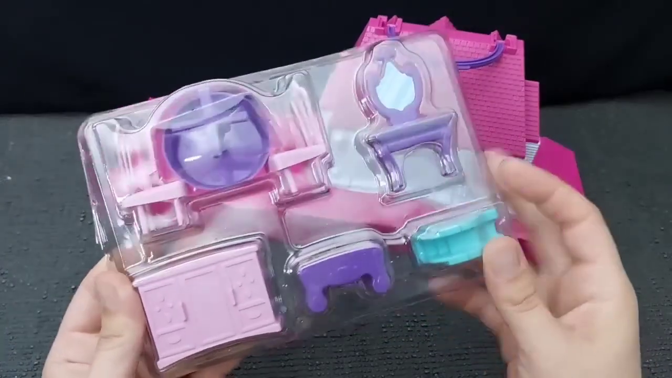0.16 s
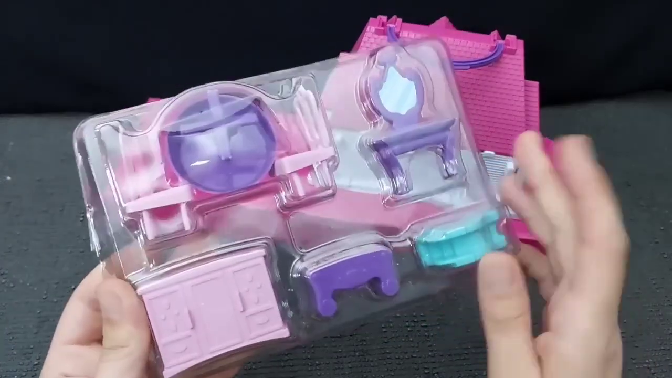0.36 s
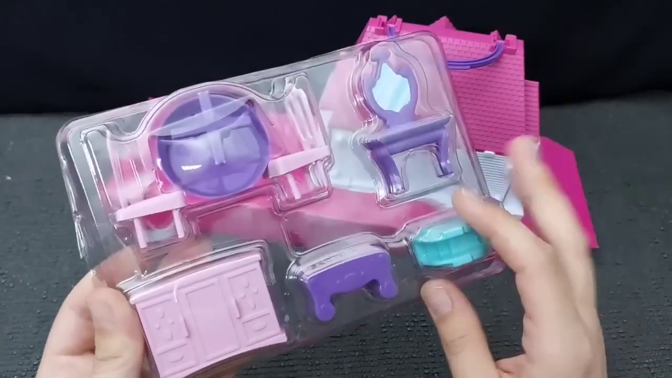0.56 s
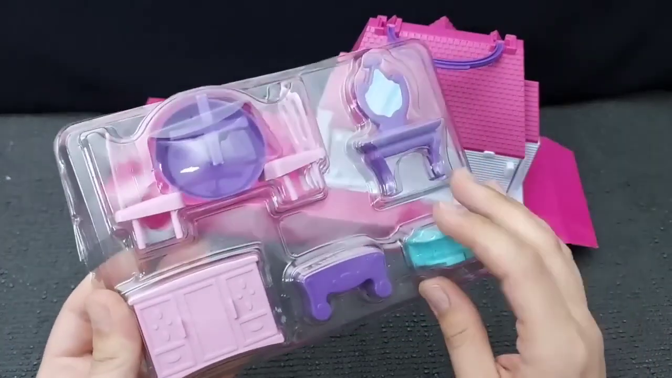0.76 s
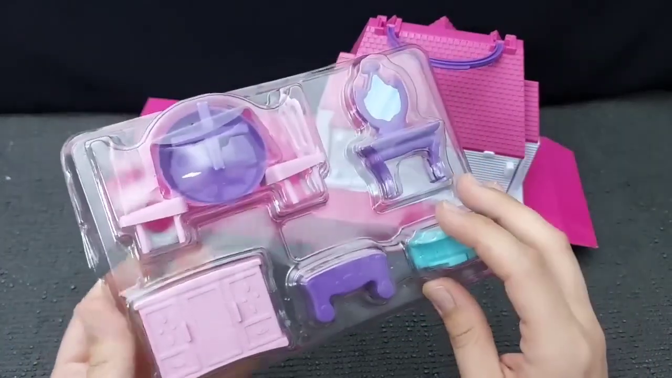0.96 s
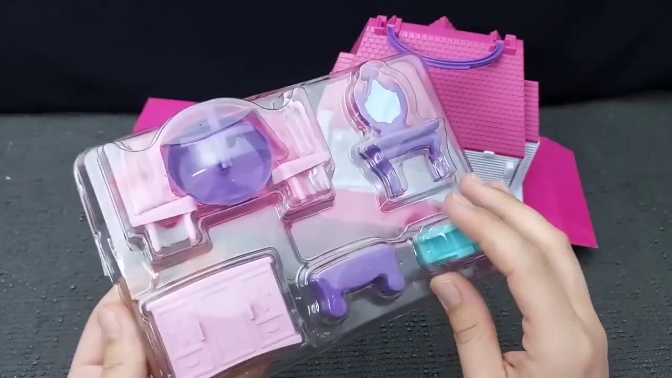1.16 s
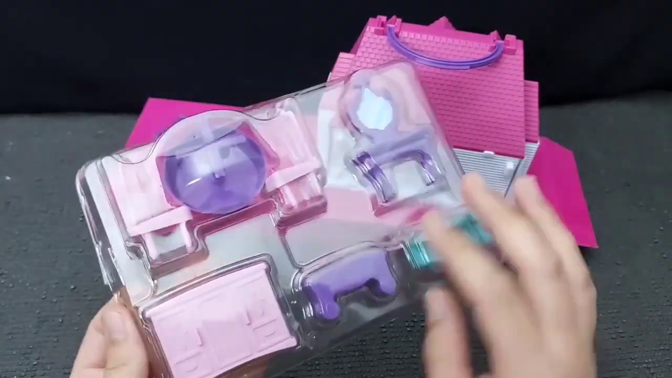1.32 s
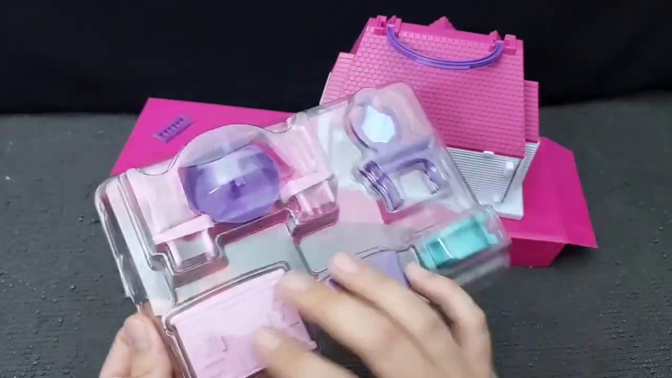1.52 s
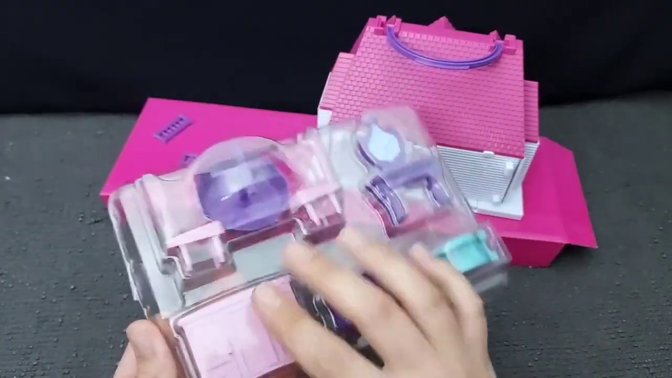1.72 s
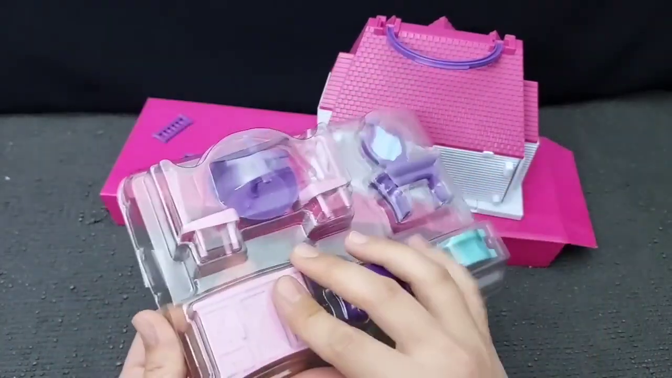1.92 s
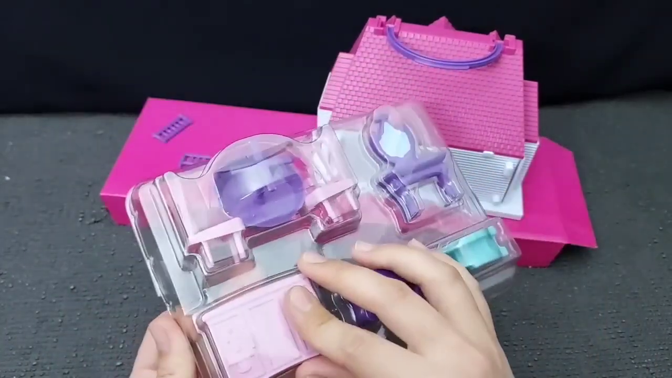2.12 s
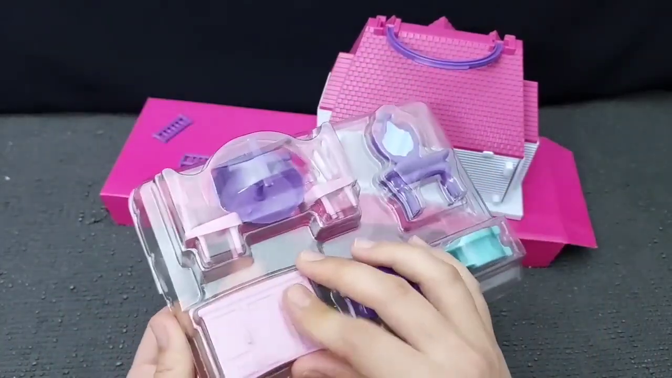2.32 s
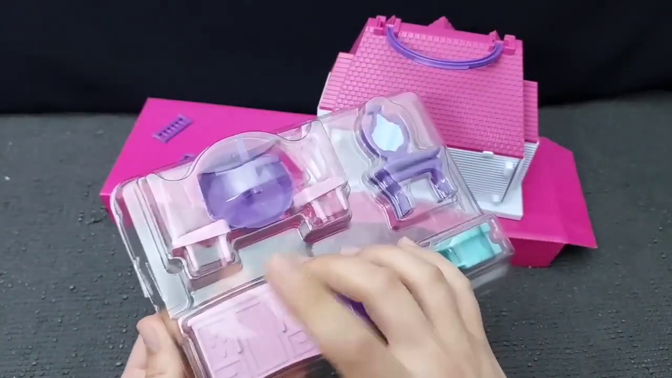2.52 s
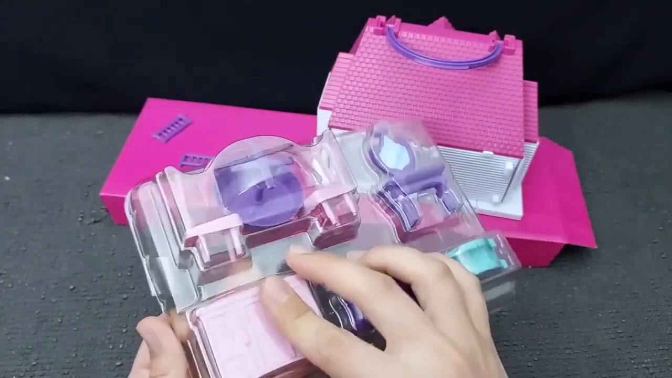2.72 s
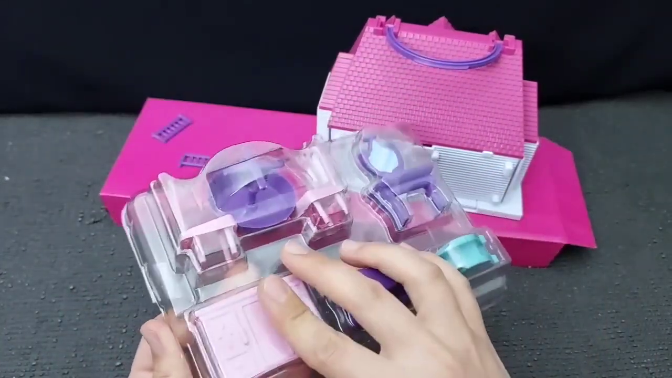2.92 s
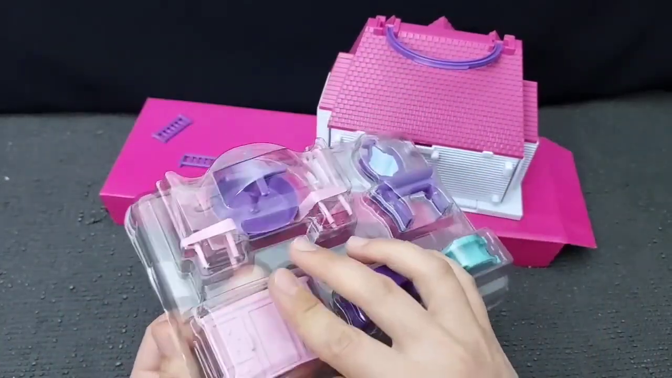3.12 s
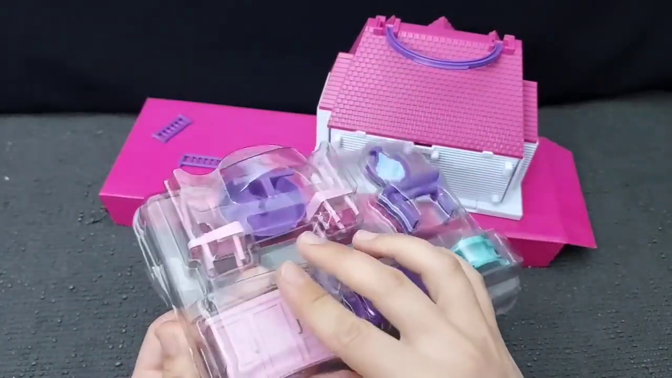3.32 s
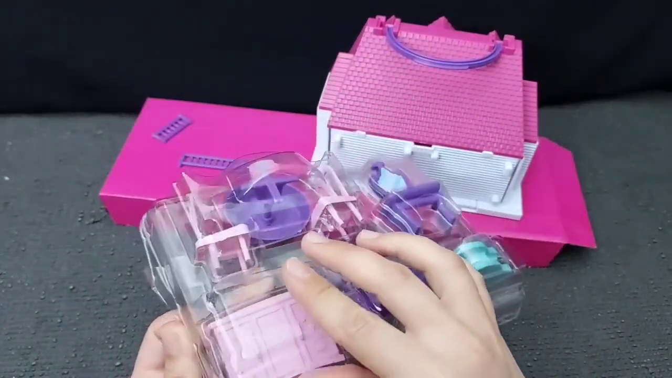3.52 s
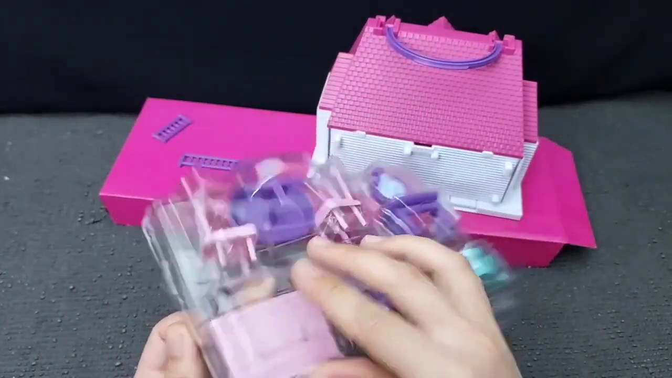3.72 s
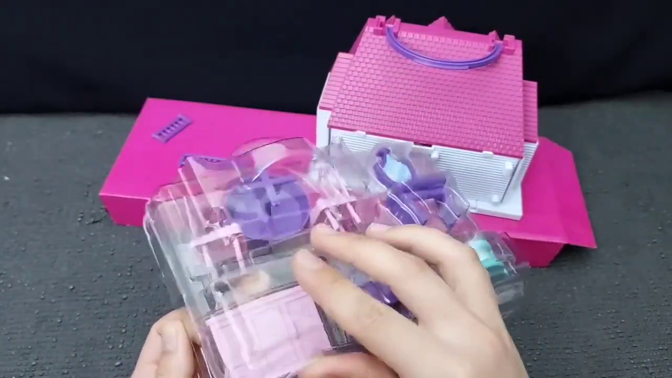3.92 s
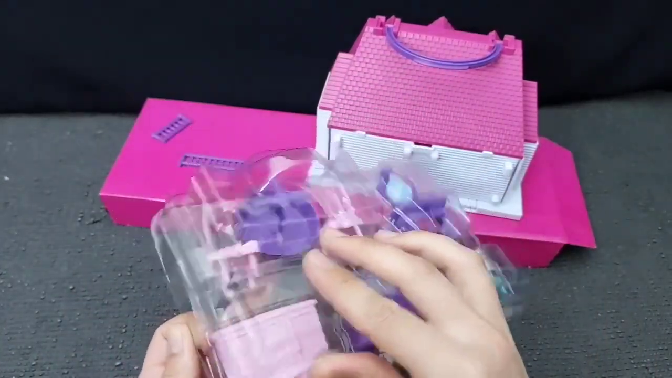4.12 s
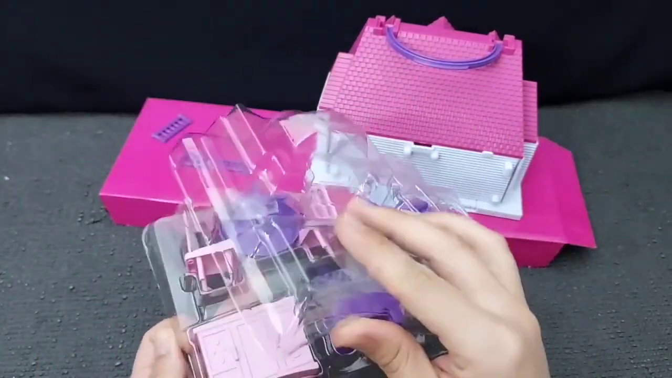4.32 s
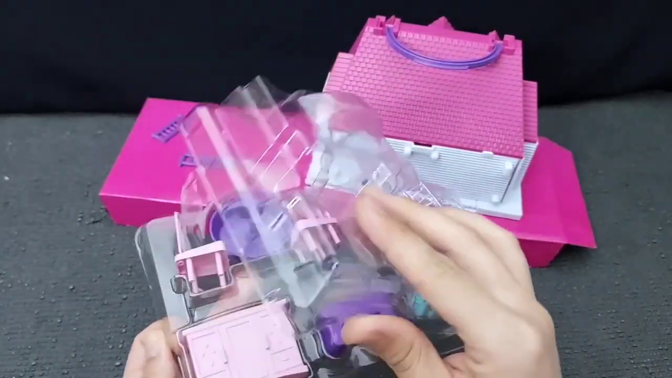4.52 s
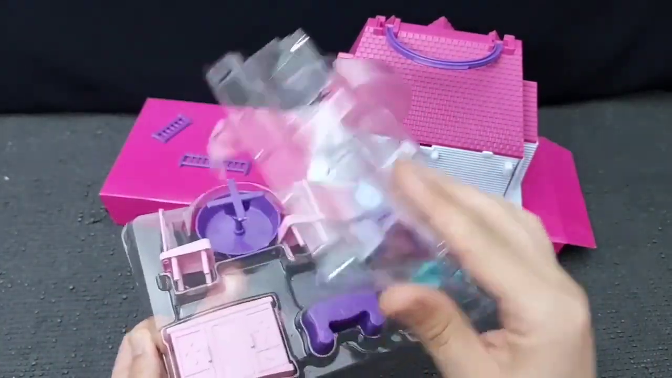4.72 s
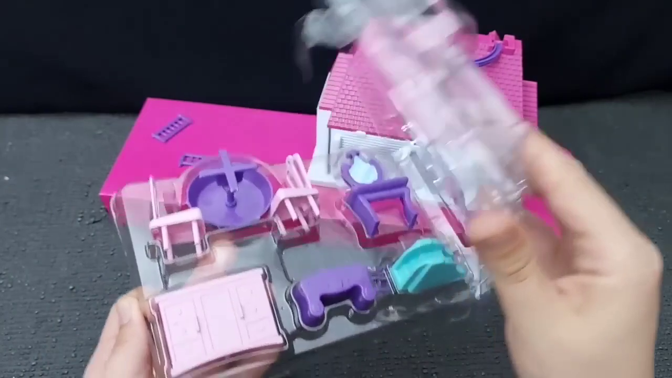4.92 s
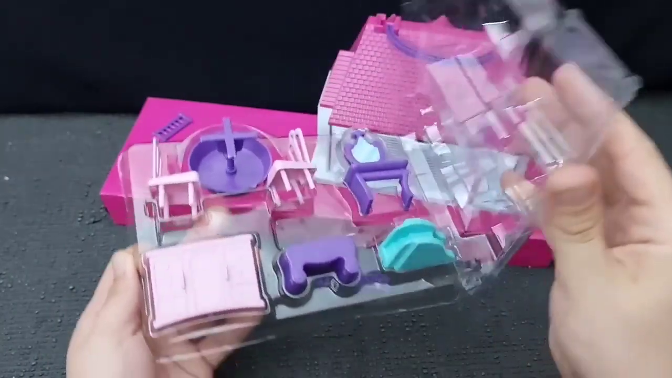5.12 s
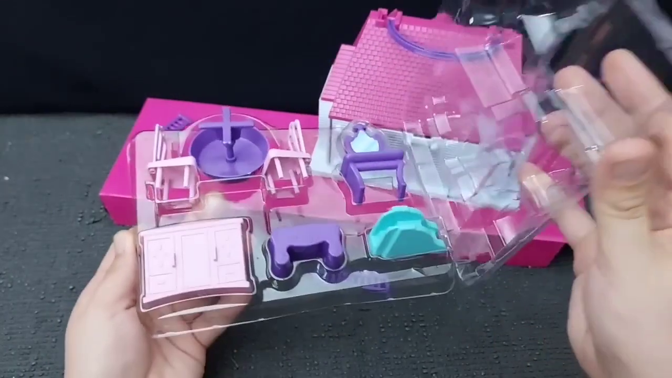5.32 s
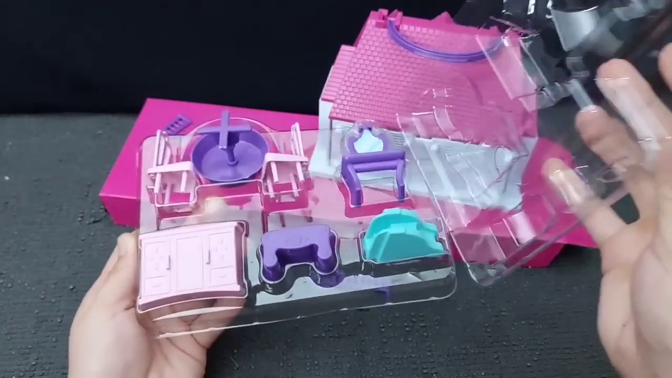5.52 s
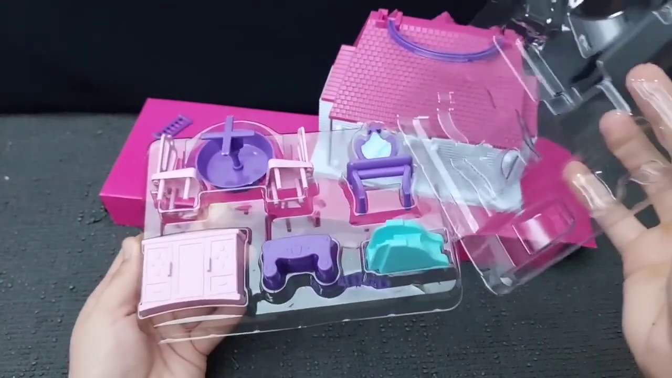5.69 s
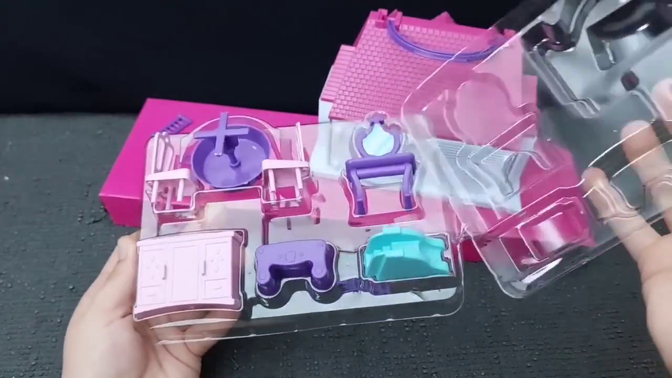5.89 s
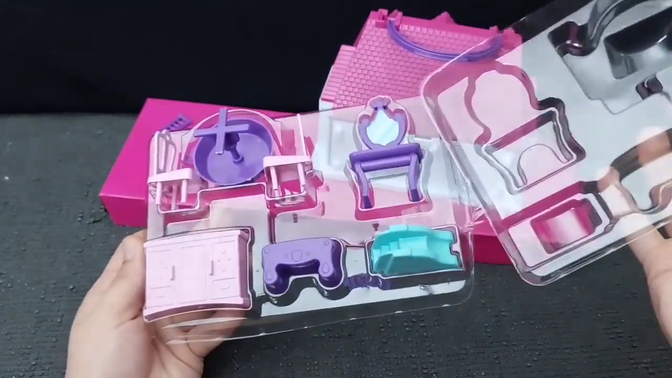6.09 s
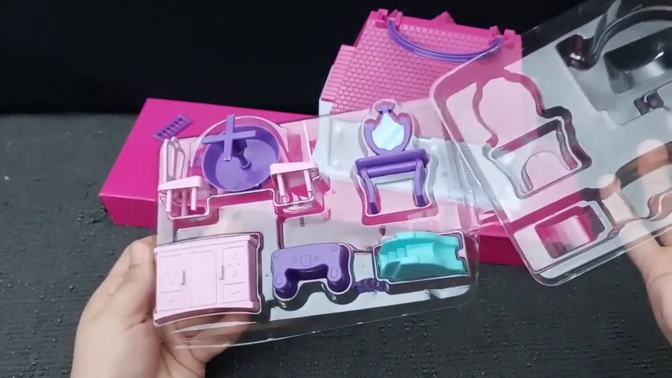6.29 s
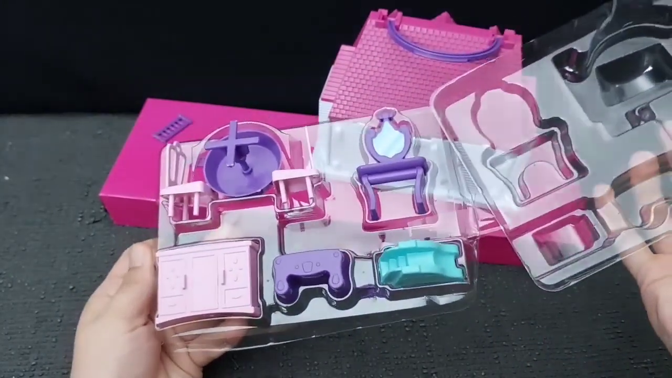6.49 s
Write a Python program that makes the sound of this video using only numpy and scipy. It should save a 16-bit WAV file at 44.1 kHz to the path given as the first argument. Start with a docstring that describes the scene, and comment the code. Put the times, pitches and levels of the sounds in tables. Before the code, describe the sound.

Close plastic clicks, faint skin rubbing and soft thumps lead to a hard double crack as a blister lid is prised loose, then sparse bright ticks.

```python
"""In a small room, two hands prise the clear lid off a thin plastic blister tray of small toys. Snaps are
bursts of decaying band noise plus a sine at the buckling panel's own note. Scrapes, skin rub, creases and toys
rattling in their pockets are random slips, filtered or ringing at set notes. Pocket resonances and reflections
colour these; soft thumps, low tray motion, air and hum lie below."""
import sys
import numpy as np
from scipy import signal
from scipy.fft import rfft, irfft, next_fast_len
from scipy.io import wavfile

SR = 44100
rng = np.random.default_rng(int(sys.argv[2]) if len(sys.argv) > 2 else 0)


def to_wav(s):
    """Save 16-bit WAV."""
    ch = np.atleast_2d(s).T  # columns
    pcm = np.round(np.clip(ch, -1, 1) * 32767)  # PCM
    wavfile.write(sys.argv[1], SR, pcm.astype(np.int16))


N = 288834   # length in samples
BAND_EDGES_HZ = 22 * 2 ** (np.arange(20) / 2)[3:]   # half-octave bands


def from_db(db):
    """Logarithmic level: decibels to amplitude gain."""
    return 10 ** (np.asarray(db) / 20)


def rms_one(x):
    """Normalisation of power: the same signal at rms 1."""
    return x / np.sqrt(np.mean(x ** 2) + 1e-20)


def in_time(rows):
    """Linear interpolation: the columns of a time curve at every sample."""
    s, *columns = np.transpose(rows)
    return [np.interp(np.arange(N) / SR, s, c) for c in columns]


def at_hz(points, hz):
    """Logarithmic pitch axis: the columns of a table read at given frequencies."""
    f, *columns = np.transpose(points)
    return np.squeeze([np.interp(np.log(hz), np.log(f), c) for c in columns])


def drift(per_s):
    """Slow random modulation: a wander of rms 1 through per_s random points a second."""
    knots = rng.standard_normal(int(per_s * N / SR) + 2)
    return rms_one(np.interp(np.arange(N) / SR * per_s, np.arange(len(knots)), knots))


def band(x, low, high):
    """Band-limiting: a gentle Butterworth band-pass."""
    sos = signal.butter(2, [low, high], "band", fs=SR, output="sos")
    return signal.sosfilt(sos, x + 1e-18)


# stereo width: f/Hz, side against mid level/dB
STEREO_WIDTH = [(50, -6), (130, -10.5), (400, -11), (1000, -7), (2000, -1), (5000, 0), (12000, -0.5)]


def spread(pair, hz):
    """Interaural coherence: mid and side signals become left and right, least alike in the treble."""
    side = from_db(at_hz(STEREO_WIDTH, hz))
    left, right = pair[0] + side * pair[1], pair[0] - side * pair[1]
    return np.array([left, right]) / np.sqrt(1 + side ** 2)


def coloured(pair, spectrum):
    """Spectral shaping: two signals take on a spectrum and a stereo width; rms 1."""
    size = next_fast_len(N)
    hz = np.maximum(np.fft.rfftfreq(size, 1 / SR), 1)
    lowest, highest = spectrum[0][0], spectrum[-1][0]
    skirts = 1 / (1 + (lowest / hz) ** 4) / (1 + (hz / highest) ** 4)
    shaped = spread(rfft(pair, size), hz) * from_db(at_hz(spectrum, hz)) * skirts
    return rms_one(irfft(shaped, size)[:, :N])


def grains(per_s, size_db):
    """Stick-slip as a random point process: tiny slips of uneven size at random moments."""
    born = rng.random(N) < per_s / SR
    size = from_db(size_db * np.minimum(rng.exponential(1, N), 4))
    return born * rng.standard_normal((2, N)) * size


def crinkle(per_s, cycles, low_hz, high_hz):
    """Impulse-excited resonance: slips are dealt at random to 13 decaying notes; rms 1."""
    ticks, notes = grains(per_s, size_db=-3.5), np.geomspace(low_hz, high_hz, 13)
    dealt, out = rng.integers(0, len(notes), N), 0
    for k, hz in enumerate(notes):
        radius = from_db(-60 * hz / (cycles * SR))   # falls by 60 dB over the given cycles
        w = 2 * np.pi * hz / SR
        b, a = [0, np.sin(w)], [1, -2 * radius * np.cos(w), radius * radius]
        out = out + spread(signal.lfilter(b, a, ticks * (dealt == k) + 1e-18), hz)
    return rms_one(out)


# spectrum of the still air: f/Hz, relative level per Hz/dB
AIR_SPECTRUM = [(22, -5), (55, -5.5), (97, -10), (190, -4), (250, -5), (390, -12.5), (600, -15),
                (885, -10.5), (1450, -21), (2000, -27.5), (3500, -29.5), (13000, -23), (16000, -25.5)]
# hum partials: centre f/Hz, peak level/dB
HUM_PARTIALS = [(124, -74), (246, -72.5)]
AIR_DB = -69   # rms


def background():
    """Steady broadband noise and frequency modulation: still air and a faint, wavering hum."""
    hum = 0
    for hz, db in HUM_PARTIALS:
        phase = 2 * np.pi * np.cumsum(hz + 1.2 * drift(10)) / SR
        hum = hum + from_db(db) * np.sin(phase)
    return from_db(AIR_DB) * coloured(rng.standard_normal((2, N)), AIR_SPECTRUM) + hum


# how much the hands shift their grip; drives sway, flexing and skin drag: t/s, relative level/dB
GRIP_SHIFT = [(0, -50.5), (.15, -56.5), (.4, -61), (.9, -57), (1.2, -61.5), (1.5, -72), (1.85, -69),
              (2.25, -61), (2.55, -69.5), (2.85, -63.5), (3.35, -72.5), (4.05, -68.5), (4.33, -54),
              (4.7, -67), (5.02, -69.5), (5.25, -49), (5.7, -57), (6.35, -77)]


def grip_db():
    """A common excitation: the level of grip movement at every sample."""
    return in_time(GRIP_SHIFT)[0]


# spectrum of the rumble of the moving hands: f/Hz, relative level per Hz/dB
SWAY_SPECTRUM = [(24, -6), (38, 1), (52, 1), (66, -4), (85, -14), (115, -9)]
# centre of the tray's swing, lower and weaker once the lid is off
SWING_LID_ON_HZ, SWING_LID_OFF_HZ = 56, 42
LID_OFF_S, LID_OFF_SWING_DB = 3.8, -3.5


def swaying(rumble_db, swing_db, follows, wobble_db, wander_hz):
    """Driven low-frequency oscillation: the moving hands rumble and keep the whole tray swinging."""
    grip = grip_db()
    lid_off = np.arange(N) / SR > LID_OFF_S
    hz = np.where(lid_off, SWING_LID_OFF_HZ, SWING_LID_ON_HZ) + wander_hz * drift(2)
    swing_level = from_db(swing_db + LID_OFF_SWING_DB * lid_off + wobble_db * drift(2.6))
    swing = swing_level * np.sin(2 * np.pi * np.cumsum(hz) / SR)
    rumble = from_db(rumble_db) * coloured(rng.standard_normal((2, N)), SWAY_SPECTRUM)
    return from_db(follows * (grip - grip.mean())) * (swing + rumble)


# finger pads landing on the tray: t/s, initial level/dB, f/Hz, t60/s
PAD_LANDINGS = [(0.059, -48.5, 105, 0.48), (.54, -24.5, 100, 0.023), (0.716, -38.5, 90, .08),
                (.787, -31.5, 92, 0.039), (2.056, -38, 125, 0.46), (2.802, -41, 240, 0.12),
                (3.753, -32.5, 163, .1), (4.17, -27.5, 133, 0.14), (5.144, -45, 105, 0.22),
                (5.74, -50.5, 370, .06)]


def thumps():
    """Free damped oscillation: a soft push leaves the whole tray swinging as a decaying sine."""
    out = np.zeros(N)
    for s, db, hz, t60 in PAD_LANDINGS:
        t = np.arange(N - int(s * SR)) / SR
        decay = from_db(db - 60 * np.minimum(t / t60, 2))
        out[-len(t):] += decay * np.sin(2 * np.pi * hz * t)
    return out


# spectrum of the flexing tray: f/Hz, relative level per Hz/dB
FLEX_SPECTRUM = [(95, -12), (130, -0.5), (170, -8), (205, -8.5), (235, 4), (255, 4.5), (280, -8.5),
                 (380, -19), (500, -25.5)]


def flexing(level_db, wobble_db):
    """Forced plate vibration: the whole tray drums softly as the grip shifts."""
    level = from_db(grip_db() + level_db + wobble_db * drift(12))
    return level * coloured(rng.standard_normal((2, N)), FLEX_SPECTRUM)


# strain around each snap: rise and fall, then dB of strain per dB of snap
STRAIN_RISE_DB_PER_S, STRAIN_FALL_DB_PER_S = 900, 170.5
STRAIN_FOLLOWS = 0.91


def strain_db():
    """Storage and release of elastic energy: strain builds fast before a snap and eases slower after."""
    s, db = np.array(SHEET_SNAPS).T[:2, :, None]
    t = np.arange(0, N, SR // 1000) / SR
    away_db = np.maximum(STRAIN_RISE_DB_PER_S * (s - t), STRAIN_FALL_DB_PER_S * (t - s))
    strongest = np.max(STRAIN_FOLLOWS * (db - db.mean()) - away_db, axis=0)
    return np.interp(np.arange(N) / SR, t, strongest)


# spectrum of dull skin drag: f/Hz, relative level per Hz/dB
DRAG_SPECTRUM = [(210, -37), (350, -1), (613, 3.5), (931, 3), (1300, -12), (1630, -11.5), (2000, -13.5),
                 (2310, -16), (4000, -24.5), (5200, -52), (8800, -120)]
# spectrum of bright scuffing, also heard in the scrapes: f/Hz, relative level per Hz/dB
SCUFF_SPECTRUM = [(1470, -26), (2500, 1.5), (4140, -11), (4550, -5), (5870, -1.5), (7890, -15.5),
                  (12100, -6), (16000, -18.5)]


def rubbing(grip_drag_db, strain_drag_db, scuff_db, ticks_db, flutter_db):
    """Stick-slip friction: skin and lid slip in spurts, and creases tick, with grip and strain."""
    strain = from_db(strain_db())
    drag_level = from_db(grip_db() + grip_drag_db) + from_db(strain_drag_db) * strain
    dull = drag_level * coloured(grains(per_s=2200, size_db=4.5), DRAG_SPECTRUM)
    scuff = coloured(grains(per_s=1000, size_db=3.5), SCUFF_SPECTRUM)
    bright = from_db(scuff_db) * strain * scuff
    creases = crinkle(per_s=74, cycles=20, low_hz=617, high_hz=6000)
    ticks = from_db(ticks_db) * np.sqrt(strain) * creases
    return from_db(flutter_db * drift(45)) * (dull + bright + ticks)


# toys rattling in their pockets after a stud lets go: start t/s, end t/s, relative level/dB
POCKET_RATTLES = [(3.757, 3.795, -31.5), (3.821, 3.929, -30), (4.187, 4.276, -37), (6.034, 6.079, -37)]


def chatter(level_db):
    """Repeated impact: the loose toys knock quickly inside their hollow pockets and settle."""
    t, envelope = np.arange(N) / SR, np.zeros(N)
    for start, end, db in POCKET_RATTLES:
        peak_s = start + (end - start) / 10
        envelope += from_db(db) * np.interp(t, [start, peak_s, end], [0, 1.5, .3], right=0)
    knocks = crinkle(per_s=250, cycles=35, low_hz=663.6, high_hz=1310)
    return from_db(level_db) * envelope * knocks


# strokes of skin or lid across the tray: start t/s, end t/s, relative level/dB, hiss against it/dB
STROKES = [(0.14, .232, -59, -11.5), (0.409, .5, -55, -18), (0.53, .592, -32, -17), (.684, .789, -42, -15),
           (0.794, .836, -39.5, -17), (0.982, 1.075, -43.5, -12), (1.303, 1.367, -51, -19.5),
           (1.511, 1.615, -67, -3.5), (1.62, 1.72, -55.5, -19.5), (1.775, 1.901, -59, -9),
           (2.623, 2.693, -44, -18), (2.752, 2.807, -61, -0.5), (2.8, 2.97, -67.5, -1.5),
           (2.948, 3.04, -50.5, -4.5), (3.056, 3.155, -54.5, -7), (3.426, 3.587, -66.5, -13),
           (3.788, 3.916, -28.5, -22.5), (4.135, 4.192, -29, -7.5), (4.17, 4.271, -31, -20.5),
           (5.074, 5.121, -47, -7.5), (5.129, 5.214, -47, -11), (5.324, 5.406, -47, -12),
           (5.381, 5.51, -54.5, -9.5), (5.489, 5.565, -46.5, -5), (5.626, 5.7, -65, -28),
           (6.409, 6.55, -65, -24)]
# spectrum of a stroke's body: f/Hz, relative level per Hz/dB
STROKE_SPECTRUM = [(260, 7), (500, 4.5), (950, 6), (1400, -5), (2100, -19), (3000, -13.5), (4500, -19.5)]
# flat panels that sing when rubbed: f/Hz, bandwidth/Hz
RASP_PANELS = [(1250, 52), (1750, 390), (2280, 130)]


def scrapes(level_db, flutter_db, crinkle_db, rasp_db):
    """Sliding friction: dense slips swell and fade, rasp in the panels and crease the sheet."""
    t = np.arange(N) / SR
    body, hiss = np.zeros((2, N))
    for start, end, db, hiss_db in STROKES:
        inside = (t > start) & (t < end)
        stroke = np.sqrt(np.hanning(inside.sum()))
        body[inside] += from_db(db) * stroke
        hiss[inside] += from_db(db + hiss_db) * stroke
    slips = grains(per_s=2000, size_db=1.54)
    creases = from_db(crinkle_db) * crinkle(per_s=370, cycles=20, low_hz=1250, high_hz=4440)
    rasp = 0
    for hz, width_hz in RASP_PANELS:
        b, a = signal.iirpeak(hz, hz / width_hz, fs=SR)
        rasp = rasp + spread(signal.lfilter(b, a, slips), hz)
    scuff = from_db(-1) * coloured(slips, SCUFF_SPECTRUM)
    bright = scuff + creases + from_db(rasp_db) * rms_one(rasp)
    sliding = body * coloured(slips, STROKE_SPECTRUM) + hiss * bright
    return from_db(level_db + flutter_db * drift(110)) * sliding


# centres of a snap's bass, middle and treble registers: f/Hz
REGISTER_HZ = [250, 1300, 11500]


def register_db(hz, levels):
    """Spectral tilt: a snap's level slopes from the middle towards its bass and its treble."""
    middle, bass, treble = levels
    return middle + np.interp(np.log(hz), np.log(REGISTER_HZ), [bass, 0, treble])


def panel_notes(t, levels, note_hz, cycles):
    """Modal ringing: the buckled panel sounds its note, for the given cycles to -60 dB at 1 kHz."""
    db = np.array([register_db(hz, snap) for hz, snap in zip(note_hz, levels)])
    # radiated level falls towards the high notes
    db = db + at_hz([(300, 3), (700, -1.0), (2000, -2.0), (5000, -6.5), (13000, -12)], note_hz)
    t60 = cycles / np.sqrt(note_hz * 1000)[:, None]
    ring = np.sin(2 * np.pi * note_hz[:, None] * t) * from_db(-60 * t / t60)
    ring /= np.sqrt(np.sum(ring ** 2, axis=-1, keepdims=True) / (SR / 100))   # equal energy
    return from_db(db)[:, None] * ring


# snaps of the sheet: t/s, relative middle level/dB, bass against it/dB, treble against it/dB,
# crackle length against a plain snap, note of the buckling panel f/Hz
SHEET_SNAPS = [(.05, -46.5, -5, -8.5, 0.97, 835), (0.102, -41, -8, -5, 1.12, 1000),
               (0.157, -47, 1, -10, 0.44, 870), (.418, -58, 12, 10, 1.04, 9980),
               (.539, -37.5, 0.5, -14, 1.8, 1700), (.559, -31.5, -14, -28, 0.45, 1195),
               (0.653, -49.5, -4, -18, 0.71, 756), (0.723, -44, 4.5, -15, 2.05, 2110),
               (.784, -28, -10.5, -22.5, 0.95, 1880), (0.807, -44, 8, -10, 0.5, 755),
               (0.981, -40.5, -0.5, -19.5, 0.89, 1450), (1.002, -29.5, -26, -20.5, 0.53, 2300),
               (1.041, -27, -10.5, -16, 1.04, 985), (1.053, -43, -14, -3, 0.71, 1120),
               (1.286, -56, 2, -39, 1.3, 292), (1.327, -46, -3.5, -16, 0.45, 680),
               (1.339, -40, 0, -12.5, 0.53, 740), (1.53, -55, 3.5, -23, 1.9, 570),
               (1.615, -39, 0.5, -31.5, 0.79, 880), (1.816, -54, 1, -12, .7, 305),
               (2.056, -23, -5, -13.5, 1.56, 1830), (2.286, -69.5, 21, -6, 0.88, 267),
               (2.374, -34, -1, -39, .75, 420), (2.388, -38.5, -1, -45, 0.9, 352),
               (2.447, -39, -21, -16, 1.1, 1376), (2.458, -39.5, 0, -15, 0.6, 752),
               (2.63, -41, 2, -9, 1.12, 867), (2.672, -32, -2, -13.5, 0.57, 574),
               (2.764, -56, 6, -6, 0.66, 2200), (2.89, -56, -19, 4.5, 1.4, 2190),
               (3.006, -56.5, -2, -7, .9, 1110), (3.032, -43.5, -4.5, -14.5, 0.69, 900),
               (3.079, -35.5, -1.5, -33, 1.43, 783), (3.089, -33, -7.5, -2, 0.74, 1665),
               (3.137, -34.5, -5.5, -36, 0.76, 725), (3.159, -41, -3, 2, 0.95, 1350),
               (3.271, -50.5, 2, 4.5, 1.55, 2310), (3.279, -44, -5, -31, 1.14, 335),
               (3.339, -42.5, -11.5, -40, 0.88, 790), (3.428, -63, -2, 18, 0.2, 6300),
               (3.642, -38.5, -11.5, 0, 1.28, 11000), (3.7522, -8.5, -13, -7, 1.12, 722),
               (3.778, -33, -2, -5, 1.7, 640), (3.811, -12, -15, -3, 1.1, 1760),
               (3.843, -24, -11.5, -26.5, 1.1, 1124), (3.897, -30, -11, -24, 1.32, 873),
               (4.037, -42.5, -7.5, -14, 0.87, 1174), (4.079, -62.5, 1, 12.5, 0.85, 5700),
               (4.121, -45, -10, -1, 1.4, 2980), (4.169, -15, -6.5, -13.5, 1.1, 1975),
               (4.182, -18.5, -7, -15.5, 1.59, 696), (4.209, -31, -18.5, -6, 1.44, 640),
               (4.4652, -27.5, -26, -49, 0.78, 1720), (4.515, -49.5, -3, -2, 1.05, 2480),
               (5.017, -54.5, -27.5, -28, 0.82, 2000), (5.077, -45.5, -15.5, -34, 1.1, 906),
               (5.101, -42, -10, -9, 1.25, 3520), (5.145, -41, 4, -15, 0.81, 1680),
               (5.344, -38, -10, -16, 0.81, 750), (5.436, -49.5, -24, 5.5, 0.55, 3170),
               (5.532, -42.5, -17.5, -1.5, 0.57, 1056), (5.546, -50.5, -15.5, 0, 0.98, 3100),
               (5.841, -67, 12.5, 22.5, 1.1, 7370), (5.923, -63, -3.5, 16, .8, 14500),
               (5.983, -33, 0, 12, 0.59, 7300), (5.9891, -22, -15, 0, 1.08, 4600),
               (6.015, -26.5, -12, 3.5, 1.08, 6840), (6.168, -37.5, -31, -18.5, 0.78, 950),
               (6.227, -35.5, -65, 3, 0.39, 2860), (6.279, -58, -20, 22, 0.62, 13300)]
# spectrum of a plain snap: f/Hz, relative level per Hz/dB
SNAP_SPECTRUM = [(70, -40), (140, -32), (280, -22.5), (500, -27), (900, -28), (1400, -34.5), (2000, -30.5),
                 (3000, -35.5), (4200, -35), (6200, -35), (8500, -43.5), (12000, -39), (15500, -33.5)]
# ringing of the sheet in a plain snap: f/Hz, t60/s
SHEET_DECAY = [(100, 0.19), (300, .085), (800, 0.069), (2000, 0.059), (5000, 0.026), (13000, 0.031)]


def snaps(rise_s, level_db, note_db, pan_db, crackle_db, crack_db, crack_t60_s):
    """Buckling excites dense plate modes: a crack, a crackle that mostly dies sooner up high, a note."""
    rows = np.array(SHEET_SNAPS)
    starts, levels, (length, note_hz) = rows[:, 0], rows[:, 1:-2], rows[:, -2:].T
    t = np.arange(SR // 14) / SR
    length = np.maximum(length, .2)[:, None]
    notes = from_db(note_db) * panel_notes(t, levels, note_hz, cycles=42)
    bursts = np.zeros((2, len(rows), len(t))) + notes
    unevenness = drift(900)[:len(rows) * len(t)].reshape(len(rows), -1)
    crackle = from_db(crackle_db * unevenness)
    crack = from_db(crack_db - 60 * t / crack_t60_s)
    for low, high in zip(BAND_EDGES_HZ, BAND_EDGES_HZ[1:]):
        hz = np.sqrt(low * high)
        rise = rise_s * length ** 3 * np.sqrt(2000 / hz)   # bending waves bring the treble first
        decay = from_db(-60 * t / (at_hz(SHEET_DECAY, hz) * length)) + crack
        shape = crackle * (1 - np.exp(-t / rise)) * decay
        ring = band(rng.standard_normal(bursts.shape) * shape, low, high)
        ring /= np.sqrt(np.sum(ring ** 2, axis=-1, keepdims=True) / (SR / 100))   # equal energy
        db = np.array([register_db(hz, snap) for snap in levels]) + at_hz(SNAP_SPECTRUM, hz) + level_db
        bursts += spread(ring, hz) * from_db(db)[:, None] * np.sqrt((high - low) * length)
    out = np.zeros((2, N + len(t)))
    for k, s in enumerate(starts):
        i = int(s * SR)
        out[:, i:i + len(t)] += bursts[:, k]
    return out[:, :N] * from_db([[pan_db / 2], [-pan_db / 2]])   # positive leans left


# resonances of the moulded pockets: f/Hz, bandwidth/Hz, lift/dB
POCKET_MODES = [(420, 29, -4.5), (503, 6.5, 4.5), (636, 20, -6.5), (698, 31, 2), (940, 200, 1),
                (1130, 59, 3.5), (1476, 60, -3), (1830, 790, 2.5), (2380, 130, -2), (2480, 100, 1),
                (3104, 560, -0.5)]


def pockets(x):
    """Cavity resonance: moulded pockets lift or hollow narrow bands of whatever shakes the sheet."""
    for hz, width_hz, lift_db in POCKET_MODES:
        b, a = signal.iirpeak(hz, hz / width_hz, fs=SR)
        x = x + (from_db(lift_db) - 1) * signal.lfilter(b, a, x)
    return x


# reverberation of the room: f/Hz, t60/s, level against the direct sound/dB
ROOM_DECAY = [(100, 0.13, -14.5), (300, 0.25, -9.5), (900, 0.082, -11), (2000, 0.28, -11),
              (5000, 0.23, -9.5), (13000, 0.21, -12)]


def room(x, build_s):
    """Reverberation by convolution: reflections thicken, then each band decays at its own rate."""
    t = np.arange(SR // 2) / SR
    build = 1 - np.exp(-(t / build_s) ** 2)
    response = 0
    for low, high in zip(BAND_EDGES_HZ, BAND_EDGES_HZ[1:]):
        hz = np.sqrt(low * high)
        t60, wet_db = at_hz(ROOM_DECAY, hz)
        tail = band(rng.standard_normal((2, len(t))) * build * from_db(-60 * t / t60), low, high)
        tail *= np.sqrt(2 * (high - low) / SR / np.sum(tail ** 2, axis=-1, keepdims=True))
        response = response + from_db(wet_db) * spread(tail, hz)
    return signal.fftconvolve(x, response, axes=-1)[:, :N]


def scene():
    """Superposition: sheet, lid and skin sound through pockets and room, over the tray's low motion."""
    sheet = snaps(rise_s=0.00045, level_db=-3.0, note_db=-3.5, pan_db=0.43,
                  crackle_db=1.5, crack_db=-2.5, crack_t60_s=0.0078)
    sheet = sheet + scrapes(level_db=-3.5, flutter_db=3.5, crinkle_db=0.0, rasp_db=1.5)
    skin = rubbing(grip_drag_db=-12.5, strain_drag_db=-75.5, scuff_db=-72, ticks_db=-75, flutter_db=4.5)
    tray = pockets(sheet + chatter(level_db=-3.5) + skin)
    sway = swaying(rumble_db=-67.5, swing_db=-61.5, follows=0.45, wobble_db=3, wander_hz=0.89)
    motion = flexing(level_db=0.34, wobble_db=2.0) + sway
    return tray + room(tray, build_s=0.011) + thumps() + motion + background()


CUTOFF_HZ = 15700


def record(dry):
    """Overload and band-limiting: peaks past full scale are clipped, then the top is rounded and cut."""
    rounding = signal.butter(3, 14800, fs=SR, output="sos")
    cut = signal.ellip(10, .1, 70, CUTOFF_HZ, fs=SR, output="sos")
    rounded = signal.sosfilt(rounding, np.clip(dry, -1, 1))
    return signal.sosfilt(cut, rounded)


dry = scene()
out = record(dry)
to_wav(out)
```